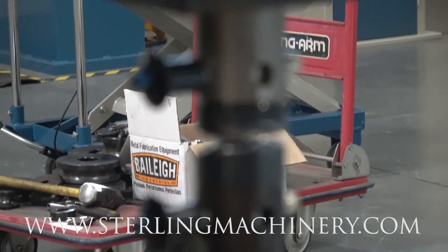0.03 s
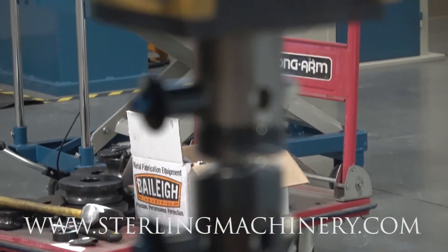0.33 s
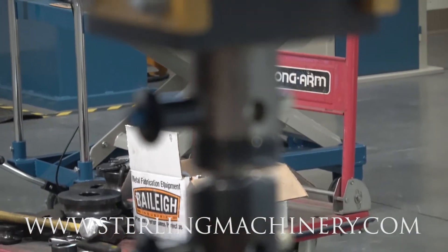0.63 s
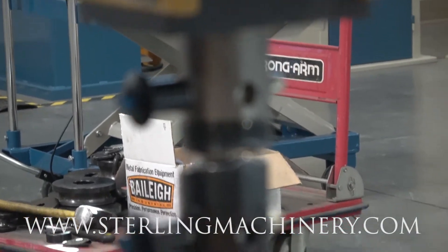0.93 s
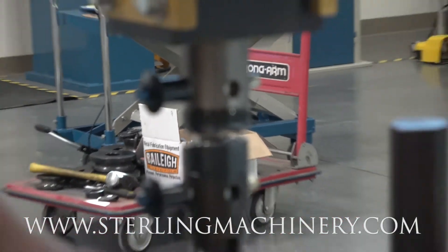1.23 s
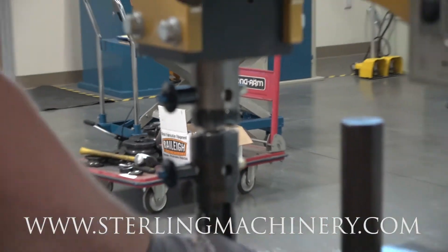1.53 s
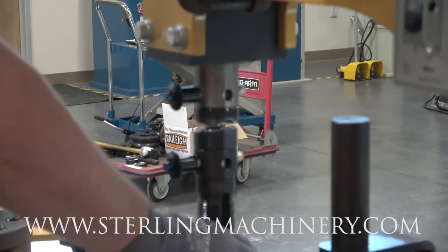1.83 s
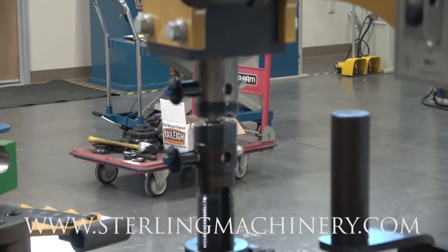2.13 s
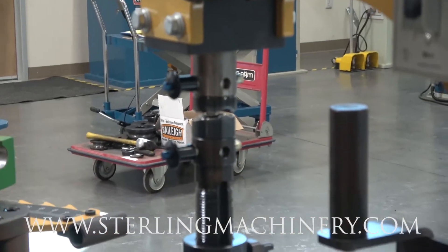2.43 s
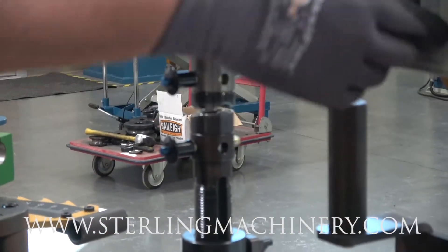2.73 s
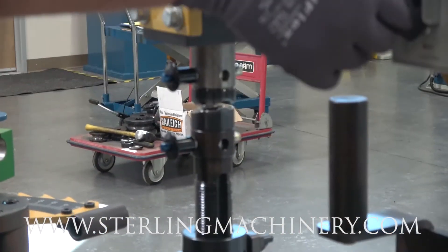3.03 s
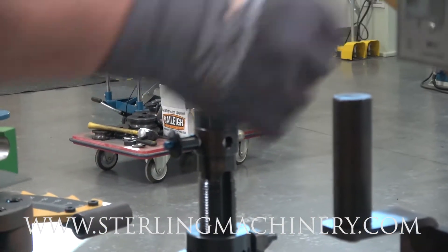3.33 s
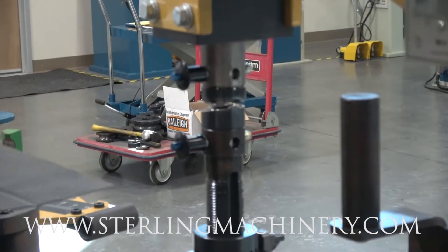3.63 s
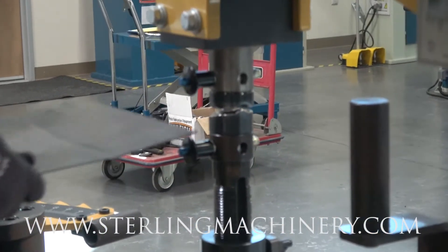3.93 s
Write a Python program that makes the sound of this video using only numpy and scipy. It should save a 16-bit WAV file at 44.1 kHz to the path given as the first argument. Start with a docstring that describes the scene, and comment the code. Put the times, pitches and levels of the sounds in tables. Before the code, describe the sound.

A machine motor snaps on and hums heavily after steel tools clink and clank.

```python
"""A power hammer's motor growls up to speed and settles into a heavy throbbing hum: each turn of the
shaft gives the housing one push, and the drive rattles and buzzes above it. The starter snaps shut to
set it going. Before that, someone shuffles about the quiet workshop and handles the steel tooling:
ticks, clinks and a ringing clank, each a short burst of vibration, some with ringing modes on top."""
import sys
import numpy as np
from scipy import signal
from scipy.fft import rfft, irfft, next_fast_len
from scipy.io import wavfile
from scipy.ndimage import map_coordinates

SR = 44100
rng = np.random.default_rng(int(sys.argv[2]) if len(sys.argv) > 2 else 0)


def output_pcm(signal):
    """Save a mono or channel-first signal as 16-bit PCM at the path in sys.argv[1].

    Samples are clipped to [-1, 1] before scaling.
    """
    pcm = np.clip(np.atleast_2d(signal).T, -1, 1) * 32767
    wavfile.write(sys.argv[1], SR, np.round(pcm).astype(np.int16))


N = 176400

START_S, RUN_UP_S, SHAFT_HZ = 3.16, .33, 29.77
FIRST_PUSH_TURNS = .63
def shaft_turns():
    """Shaft angle in turns from the first push: it gains speed evenly, then holds it."""
    speed_hz = SHAFT_HZ * np.minimum(since(START_S) / RUN_UP_S, 1)
    return np.cumsum(speed_hz) / SR - FIRST_PUSH_TURNS


# Resonances of the housing (frequency [Hz], level [dB])
HOUSING_COLOUR = [(30, -64), (100, -49), (180, -29), (208, -30), (238, -15.5), (268, 4.5), (298, 4),
                  (327, 6), (357, -24.5), (387, -9.5), (417, -7), (446, -32), (506, -19.5), (540, -52),
                  (591, -13), (625, -24.5), (670, -29), (714, -21), (770, -38), (8000, -99)]
# Hum fade-in (time [s], level [dB])
HUM_ENVELOPE = [(3.16, -47), (3.31, -42), (3.35, -26), (3.42, -25.5), (3.5, -16.5), (3.56, -17.5),
                (3.6, -11.5), (4, -11.5)]
def motor_hum(turns):
    """One push each turn, all nearly alike, rings the housing."""
    whole_turns = np.floor(turns)
    pushes = np.diff(whole_turns, prepend=whole_turns[0]) * amp(.5 * wobble(SHAFT_HZ))
    return body(pushes * np.sqrt(SR / SHAFT_HZ), HOUSING_COLOUR) * envelope(HUM_ENVELOPE)


# Body of the drive (frequency [Hz], level [dB])
DRIVE_COLOUR = [(200, -31), (420, -4), (640, -4.5), (830, -6), (1000, -7), (1250, -1.5), (1450, -1.5),
                (1700, -4), (1950, -10), (2400, -16), (3000, -17.5), (4200, -28), (7500, -35), (8400, -33),
                (9500, -38), (16000, -50.5)]
# Build of the rattle (time [s], level [dB])
DRIVE_ENVELOPE = [(3.16, -68), (3.3, -48), (3.375, -38), (3.405, -31), (3.435, -31), (3.46, -25),
                  (3.56, -23), (4, -23)]
def drive_rattle(turns, loose_share=.5, swell_db=0.9, chatter_db=1.6, points_per_turn=1480):
    """The drive's roughness repeats every turn, partly loose, and swells four times a turn."""
    repeating = rng.standard_normal(points_per_turn)[(turns % 1 * points_per_turn).astype(int)]
    force = np.sqrt(1 - loose_share) * repeating + np.sqrt(loose_share) * rng.standard_normal(N)
    swell = np.cos(2 * np.pi * 4 * turns)
    force = unit(force * amp(swell_db * swell + chatter_db * wobble(500)))
    return body(force * envelope(DRIVE_ENVELOPE), DRIVE_COLOUR)


# Drive tones at full speed (frequency [Hz], level [dB])
BUZZ_TONES = [(625, -32), (714, -33), (955, -33.5), (1158, -47), (1280, -41), (1733, -51), (1811, -44),
              (2112, -48)]
def drive_buzz(turns, waver_rad=0.59):
    """The drive's tones rise in pitch with the shaft and grow with the rattle."""
    tones = sum(amp(db) * np.sin(2 * np.pi * hz / SHAFT_HZ * turns + waver_rad * wobble(25))
                for hz, db in BUZZ_TONES)
    effort = envelope(DRIVE_ENVELOPE)
    speed_share = np.minimum(since(START_S) / RUN_UP_S, 1)
    return np.sqrt(2) * tones * effort / effort.max() * speed_share ** 2


# Growl resonances (frequency [Hz], width [Hz], level [dB])
GROWL_PEAKS = [(282, 51, -7), (585, 90, -8.5), (653, 40, -5), (717, 33, -4.5)]
# Growl and scuff envelopes (time [s], level [dB])
GROWL_ENVELOPE = [(3.16, -50), (3.24, -41), (3.29, -33), (3.36, -29.5), (3.42, -21.5), (3.48, -22),
                  (3.54, -28), (3.7, -42)]
SCUFF_ENVELOPE = [(3.17, -54), (3.28, -49.5), (3.4, -51.5), (3.418, -41.5), (3.44, -39), (3.452, -37),
                  (3.473, -36), (3.5, -58)]
# Light catches in the drive (time [s], level [dB], t60 [s])
CATCH_HITS = [(3.451, -19.5, 0.029), (3.454, -26, 0.045), (3.4685, -24, 0.039)]
# Bright EQ of scuff and catches (frequency [Hz], level [dB])
SCUFF_COLOUR = [(1700, -16), (4000, -8), (5300, -1), (7000, -3), (8500, 0), (12000, -10), (16000, -13)]
CATCH_COLOUR = [(2000, -31), (3300, -15), (4600, -0.5), (8500, -1.5), (12000, -6), (15500, -4.5)]
# Ping of the last catch (frequency [Hz], level [dB], t60 [s])
CATCH_MODES = [(8500, 0, 0.072)]
def run_up():
    """The straining motor growls; something scuffs and catches twice as it nears full speed."""
    growl = resonant_noise(GROWL_PEAKS) * envelope(GROWL_ENVELOPE)
    scuff = noise(SCUFF_COLOUR) * envelope(SCUFF_ENVELOPE) * amp(1.7 * wobble(400))
    catches = contacts(CATCH_HITS, CATCH_COLOUR, attack_s=0.00028)
    return growl + scuff + catches + ring(CATCH_HITS[-1][0], CATCH_MODES, db=-30, waver_rad=.8)


# The snap and its bounces (time [s], level [dB], t60 [s])
SNAP_HITS = [(3.1583, -5, 0.0044), (3.1595, 4.5, 0.0075), (3.1625, -13.5, 0.035), (3.1685, -14.5, 0.035)]
# Snap EQ (frequency [Hz], level [dB])
SNAP_COLOUR = [(120, -65), (300, -27), (560, -8), (830, 0.5), (1250, -11), (2090, 0.5), (2650, -12.5),
               (4040, -14.5), (4680, -4), (5730, -4), (7680, -9), (8350, 0), (8900, -11), (11700, -4),
               (16000, -29)]
# Ring of the starter box (frequency [Hz], level [dB], t60 [s])
BOX_MODES = [(716, 2.5, 0.2), (840, 3, 0.14), (1504, -5.5, 0.44), (2010, -7.5, 0.33)]
def starter():
    """The starter's contacts slam shut, bounce and ring their box."""
    snap = contacts(SNAP_HITS, SNAP_COLOUR, attack_s=0.00023, treble_life=0.53)
    return snap + ring(SNAP_HITS[0][0], BOX_MODES, db=-28.5, waver_rad=0.42)


# Seating clunk and final clank (time [s], level [dB], t60 [s])
CLUNK_HITS = [(2.2902, -17.5, 0.027), (2.294, -22, 0.09)]
CLANK_HITS = [(2.472, -9.5, 0.071)]
# The slide between them (time [s], level [dB])
SLIDE_ENVELOPE = [(2.33, -77), (2.365, -43.5), (2.385, -33.5), (2.42, -42), (2.468, -40.5), (2.49, -66)]
# EQ of each move (frequency [Hz], level [dB])
CLUNK_COLOUR = [(120, -52), (200, -13), (836, -6), (986, -12.5), (1250, 2), (1680, -10), (2170, -9),
                (2650, -13.5), (6880, -8.5), (16000, -18)]
SLIDE_COLOUR = [(400, -16), (800, -3), (1500, -16), (3500, -13.5), (4500, -21.5), (7300, -13), (11000, -21),
                (15500, -24)]
CLANK_COLOUR = [(240, -50), (400, -16), (1140, -8), (1270, -3), (1530, -17), (1680, -9), (2320, -14.5),
                (3420, -11), (5270, -8.5), (7170, 1.5), (16000, -11.5)]
# Ring-out of the steel (frequency [Hz], level [dB], t60 [s])
CLUNK_MODES = [(1248, 6.5, 0.26), (2220, -2, 0.27), (2965, 1, 0.16), (3640, -5, .6), (4540, -3, 0.44),
               (5930, 2, .08)]
CLANK_MODES = [(1039, -4.5, 1.1), (1390, -1, 0.37), (1685, -5, 0.69), (2466, 6, 0.48), (2745, -1, 0.45),
               (3504, 1.5, 0.35), (3505, -9, 1.6), (4312, 1, 0.45), (4559, 7, 0.18), (4560, -7, 0.8),
               (7135, 6, 0.18), (9053, -2, 0.16)]
def tool_on_die():
    """The tool is seated on the die, slides and drops home with a ringing clank."""
    clunk = contacts(CLUNK_HITS, CLUNK_COLOUR, attack_s=0.00081, treble_life=0.53)
    clunk += ring(CLUNK_HITS[0][0], CLUNK_MODES, db=-36.5, waver_rad=0.91)
    slide = noise(SLIDE_COLOUR) * envelope(SLIDE_ENVELOPE) * amp(1.3 * wobble(200))
    clank = contacts(CLANK_HITS, CLANK_COLOUR, attack_s=0.0016, treble_life=0.66)
    clank += ring(CLANK_HITS[0][0], CLANK_MODES, db=-38.5, waver_rad=0.34)
    return clunk + slide + clank


# Clink transients (time [s], level [dB], t60 [s])
CLINK_HITS = [(1.5148, -24, 0.046), (1.518, -25, 0.043), (1.525, -23.5, 0.051)]
# Clink EQ (frequency [Hz], level [dB])
CLINK_COLOUR = [(200, -8), (1000, -13.5), (1800, -9), (3500, -7), (4700, -9.5), (6300, -1), (7200, -6.5),
                (9000, -5.5), (11000, -14.5), (16000, -13.5)]
# Ring of the part (frequency [Hz], level [dB], t60 [s])
CLINK_MODES = [(1785, -8, 0.44), (2770, -13, 0.28), (4040, -1, 0.14), (6300, 2, 0.14), (6570, 4, 0.11),
               (8400, -9, 0.092)]
def steel_clink():
    """A small steel part makes three quick contacts and rings from the second."""
    hits = contacts(CLINK_HITS, CLINK_COLOUR, attack_s=0.00025, treble_life=0.45)
    return hits + ring(CLINK_HITS[1][0], CLINK_MODES, db=-34.0, waver_rad=0.98)


# Handling hits, plus a thin click on the shoe tap at 0.644 s (time [s], level [dB], t60 [s])
TICK_HITS = [(.133, -44, .02), (.3645, -24, 0.01), (.366, -31, 0.052), (.644, -38, 0.012),
             (3.097, -44, 0.036)]
KNOCK_HITS = [(1.635, -34, 0.22), (2.283, -25.5, 0.073)]
# Thin tick EQ, dull knock EQ (frequency [Hz], level [dB])
TICK_COLOUR = [(590, -38), (1000, -24), (2030, -15), (4300, -4.5), (9000, -19), (16000, -34)]
KNOCK_COLOUR = [(120, -64), (200, -10.5), (970, 3), (1360, -7), (2680, -20), (5200, -45), (8800, -120)]
def handling():
    """Steel parts tick and knock as they are picked up; one thin click sharpens a shoe tap."""
    ticks = contacts(TICK_HITS, TICK_COLOUR, attack_s=0.0012, treble_life=0.64)
    return ticks + contacts(KNOCK_HITS, KNOCK_COLOUR, attack_s=0.0014)


# Rub resonances (frequency [Hz], width [Hz], level [dB])
RUB_PEAKS = [(1517, 100, 3.5), (2037, 45, 3.5), (3260, 660, -11)]
# Strokes (time [s], length [s], level [dB])
RUB_STROKES = [(.94, 0.07, -57), (1.27, 0.44, -55.5)]
def steel_rub():
    """Steel rubs faintly on steel."""
    return resonant_noise(RUB_PEAKS) * swells(RUB_STROKES)


# Shuffling steps and low bumps (time [s], length [s], level [dB])
SHUFFLE_STEPS = [(.49, .11, -37), (.68, 0.22, -37.5), (.86, 0.15, -43.5), (1.13, 0.18, -41),
                 (1.32, 0.21, -44.5), (2.04, 0.13, -46), (2.2, 0.12, -33.5), (2.39, 0.41, -43),
                 (3.06, 0.051, -40.5)]
BUMP_SWELLS = [(.79, 0.33, -43), (.875, 0.085, -44), (1.4, 0.064, -35), (2.08, 0.17, -42), (2.5, 0.17, -38)]
# Shoe taps (time [s], level [dB], t60 [s])
TAP_HITS = [(.017, -40, .03), (.497, -37, .05), (.584, -35.5, .06), (.645, -26, .035), (.692, -28, .045)]
# Cloth rustle (time [s], level [dB])
CLOTH_ENVELOPE = [(0, -74), (.3, -66.5), (.62, -51.5), (.8, -53), (1.1, -61), (1.35, -55), (1.5, -55),
                  (1.85, -60.5), (2.03, -48.5), (2.2, -53.5), (2.8, -55.5), (3.1, -64)]
# Foley EQ (frequency [Hz], level [dB])
SHUFFLE_COLOUR = [(40, 1), (170, 2.5), (260, 1), (380, -5.5), (520, -9), (750, -11.5), (1100, -20.5),
                  (1500, -17.5), (3000, -35), (8000, -53)]
TAP_COLOUR = [(60, -14), (290, 0), (480, -3), (750, -8), (1200, -22), (2200, -22), (8000, -46)]
CLOTH_COLOUR = [(1180, -27), (2000, 4.5), (3120, 5.5), (3370, 3.5), (8330, 1.5), (16000, -14)]
def movement(scrape_db=2.2):
    """Shoes scrape unevenly and tap the floor, clothes rustle, and soft bumps sound underneath."""
    shuffle = unit(noise(SHUFFLE_COLOUR) * amp(scrape_db * wobble(70))) * swells(SHUFFLE_STEPS)
    cloth = noise(CLOTH_COLOUR) * envelope(CLOTH_ENVELOPE) * amp(1.1 * wobble(64))
    rumble = noise([(10, -40), (30, 2.5), (70, -15.5), (130, -17), (400, -43), (2000, -110)])
    taps = contacts(TAP_HITS, TAP_COLOUR, attack_s=0.00061)
    return shuffle + cloth + rumble * swells(BUMP_SWELLS) + taps


# Reverb decay (frequency [Hz], t60 [s])
WORKSHOP_DECAY = [(200, 1), (2000, 1), (5000, 0.42), (9000, 0.19), (14000, 0.14)]
def workshop_reverb(send, predelay_samples=300):
    """The hall's diffuse tail, shorter in the treble."""
    hz, t, spectrum = signal.stft(rng.standard_normal(SR), SR, nperseg=256)
    decay = amp(-60 * t / along(WORKSHOP_DECAY, hz)[:, None])
    tail = signal.istft(spectrum * decay, SR, nperseg=256)[1]
    return signal.fftconvolve(send, np.pad(tail, (predelay_samples, 0)) / np.linalg.norm(tail))[:N]


# Room tone EQ (frequency [Hz], level [dB])
ROOM_COLOUR = [(12, -30), (20, 3.5), (146, -7), (301, -8), (500, -11.5), (1330, -16.5), (2020, -22),
               (3440, -26), (16000, -34)]
def room_tone(db=-46):
    """A steady, dark bed of workshop air."""
    return amp(db) * noise(ROOM_COLOUR)


def contacts(hits, colour, attack_s, treble_life=1, split_hz=9000):
    """Each contact is a burst of dense vibration; treble_life scales its t60 above split_hz."""
    def bursts(life):
        return sum(amp(db - 60 * since(s) / (t60 * life)) * (1 - np.exp(-since(s) / attack_s))
                   for s, db, t60 in hits)
    force = rng.standard_normal(N)
    low = filtered(force, lambda hz: 1 / (1 + (hz / split_hz) ** 4))
    return body(low * bursts(0.97) + (force - low) * bursts(treble_life), colour)


def ring(start_s, modes, db, waver_rad):
    """Decaying modes struck together, each a little unsteady in phase."""
    t = since(start_s)
    tones = sum(amp(mode_db - 60 * t / t60) * np.sin(2 * np.pi * hz * t + waver_rad * wobble(60))
                for hz, mode_db, t60 in modes)
    return amp(db) * tones * (1 - np.exp(-t / 0.00084))


def body(x, colour, size=16384):
    """x through a causal resonator of the given colour and unit energy."""
    cepstrum = irfft(np.log(amp(along(colour, np.fft.rfftfreq(size, 1 / SR)))))
    cepstrum[1:size // 2] *= 2  # fold to minimum phase
    cepstrum[size // 2 + 1:] = 0
    impulse = irfft(np.exp(rfft(cepstrum)))
    return signal.fftconvolve(x, impulse / np.linalg.norm(impulse))[:N]


def noise(colour):
    """Coloured noise of rms 1."""
    return unit(filtered(rng.standard_normal(N), lambda hz: amp(along(colour, hz))))


def resonant_noise(peaks):
    """Noise of rms 1 through resonant peaks."""
    gain = lambda f: sum(amp(db) / (1 + ((f - hz) / (width / 2)) ** 2) for hz, width, db in peaks)
    return unit(filtered(rng.standard_normal(N), gain))


def filtered(x, response):
    """x through a gain that depends on frequency."""
    size = next_fast_len(N + SR // 2)
    return irfft(rfft(x, size) * response(np.fft.rfftfreq(size, 1 / SR)), size)[:N]


def envelope(points):
    """Gain per sample through the points, silent outside them."""
    s, db = np.transpose(points)
    return amp(np.interp(np.arange(N) / SR, s, db, left=-120, right=-120))


def swells(rows):
    """Gain of bell-shaped swells, each centred on its time."""
    t = np.arange(N) / SR
    return sum(amp(db) * np.exp(-((t - s) / (length / 2)) ** 2) for s, length, db in rows)


def wobble(rate):
    """A smooth random curve, rate knots a second."""
    return map_coordinates(rng.standard_normal(int(N * rate / SR) + 4), [np.arange(N) * rate / SR])


def along(points, hz):
    """A curve read on a log frequency axis."""
    knots_hz, values = np.transpose(points)
    return np.interp(np.log(hz + 1), np.log(knots_hz + 1), values)


def since(s):
    """Seconds since s, zero before it."""
    return np.maximum(np.arange(N) / SR - s, 0)


def amp(db):
    """Decibels to gain."""
    return 10 ** (np.asarray(db) / 20)


def unit(x):
    """Scale to rms 1."""
    return x / np.sqrt(np.mean(x ** 2) + 1e-20)


def scene():
    """Tools, starter and drive feed the reverb; hum, movement and room tone stay dry."""
    turns = shaft_turns()
    tools = handling() + steel_clink() + tool_on_die() + steel_rub()
    snap = starter()
    drive = drive_rattle(turns) + drive_buzz(turns) + run_up()
    hall = workshop_reverb(amp(-10.5) * tools + amp(-16.5) * snap + amp(-17.5) * drive)
    return (motor_hum(turns) + drive + snap + tools + movement() + hall + room_tone())[None]


def record(dry, top_hz=16000):
    """Peaks are soft-clipped at full scale and everything above top_hz is cut."""
    rounded = dry[0] / (1 + np.abs(dry[0]) ** 8) ** (1 / 8)
    return filtered(rounded, lambda hz: hz < top_hz)[None]


dry = scene()
out = record(dry)
output_pcm(out)
```